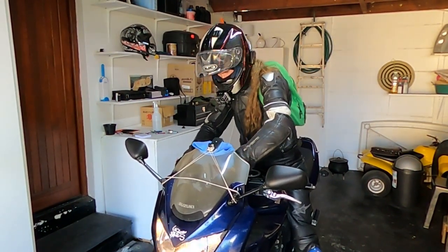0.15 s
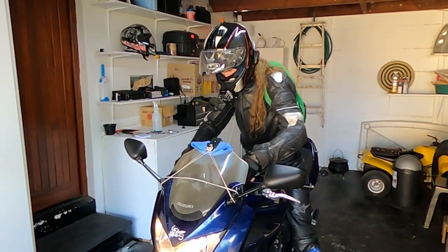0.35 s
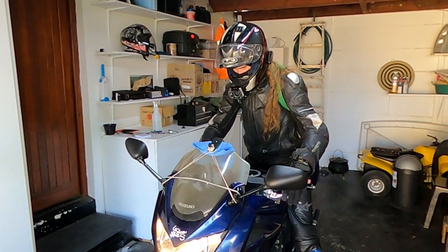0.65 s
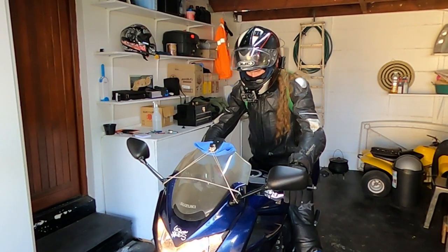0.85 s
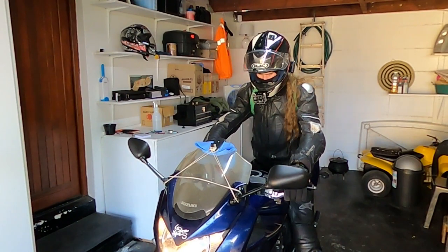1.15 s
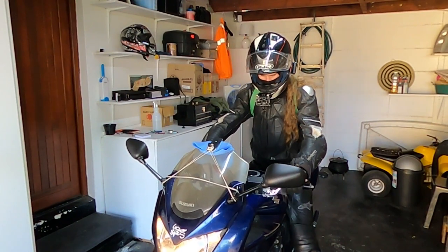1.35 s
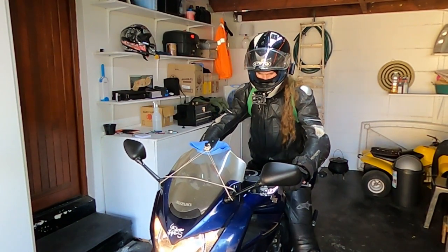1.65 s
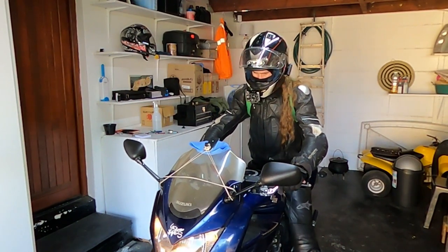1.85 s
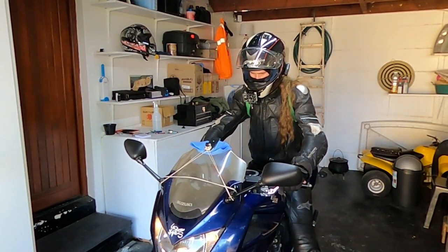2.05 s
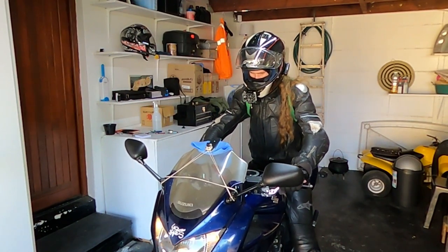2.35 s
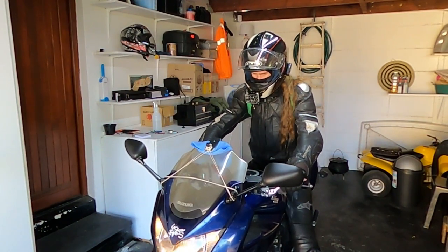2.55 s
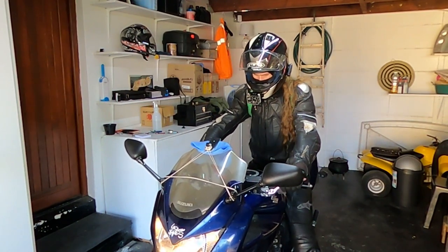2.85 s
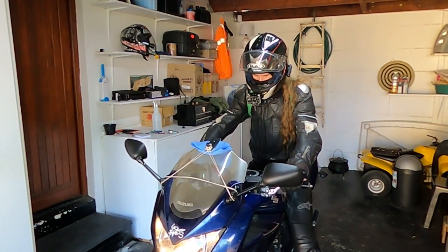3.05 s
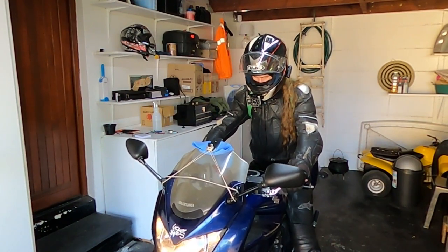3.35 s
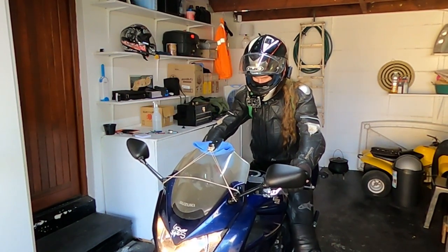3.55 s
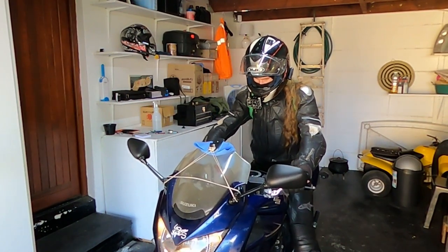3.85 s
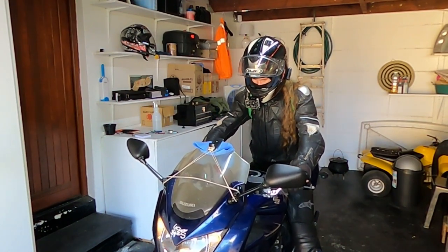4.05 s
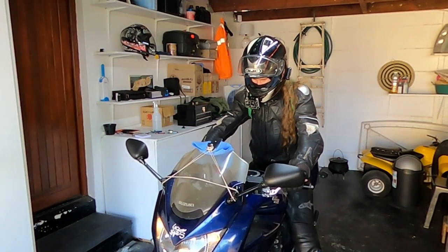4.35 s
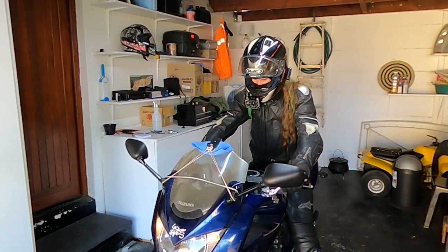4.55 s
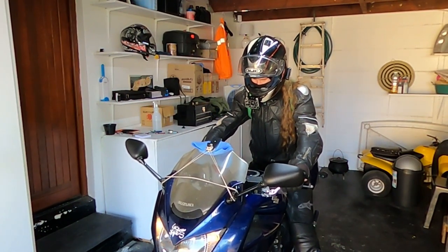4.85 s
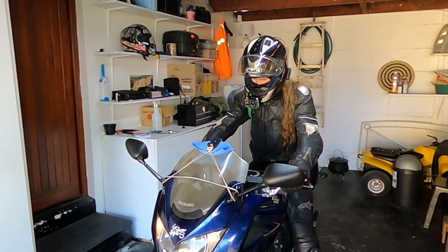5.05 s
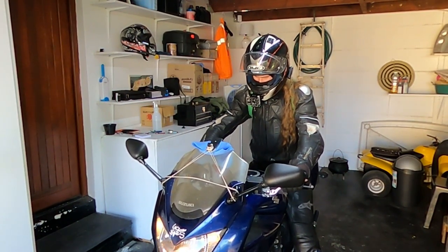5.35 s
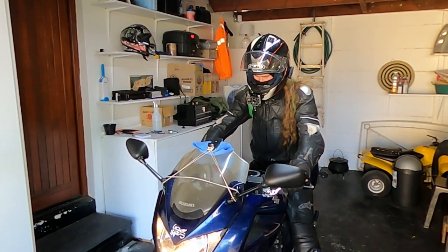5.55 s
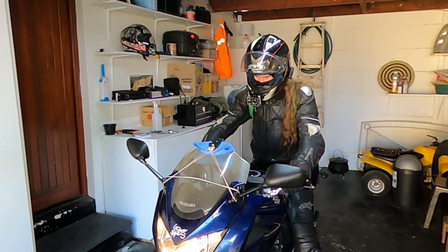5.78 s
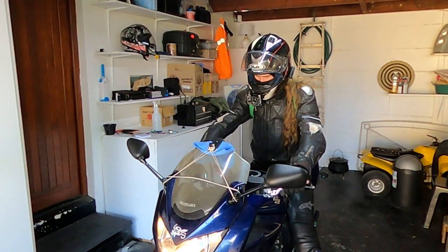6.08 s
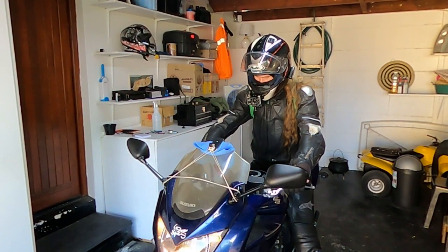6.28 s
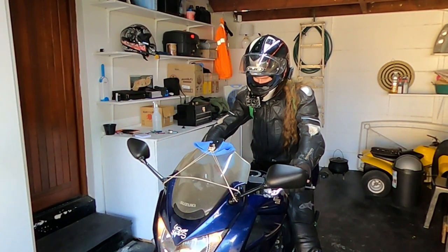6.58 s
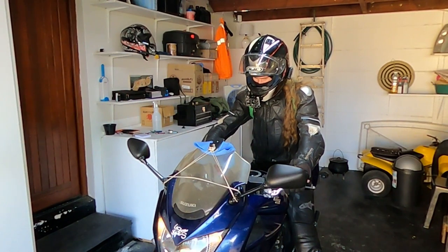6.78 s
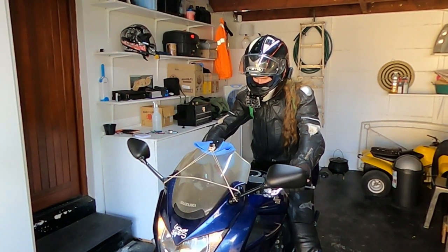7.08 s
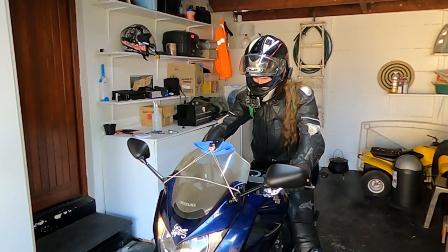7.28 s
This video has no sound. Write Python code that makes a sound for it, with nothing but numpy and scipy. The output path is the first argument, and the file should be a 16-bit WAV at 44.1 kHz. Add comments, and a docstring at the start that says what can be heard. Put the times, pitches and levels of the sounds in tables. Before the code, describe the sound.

In a small garage a motorcycle starter whines and sags through three cranking attempts, the exhaust booming briefly before the engine clacks to a stop

```python
"""A motorcycle is cranked three times in a small garage and will not stay running.
A switch clicks and the rider shifts in creaking leathers; then the starter gears whine, sagging at every compression.
Each time a few charges fire and boom in the exhaust; twice the engine coasts down and stops with a clack.
Whine: phase-driven tones. Exhaust, bike and switch: decaying modes. Grind, clatter, gas and leather: shaped noise."""
import sys
import numpy as np
from scipy import signal
from scipy.fft import rfft, irfft, next_fast_len
from scipy.io import wavfile
from scipy.ndimage import uniform_filter1d, map_coordinates

SR = 44100
rng = np.random.default_rng(int(sys.argv[2]) if len(sys.argv) > 2 else 0)


def store_pcm(level_fs):
    """Save levels as 16-bit WAV."""
    pcm = np.round(np.clip(level_fs, -1, 1) * 32767).astype(np.int16)
    wavfile.write(sys.argv[1], SR, np.atleast_2d(pcm).T)


N = 327222
TIME = np.arange(N) / SR

# presses of the starter button: (pressed [s], released [s], crank stops [s], top of first heave [Hz],
# rise to that top [s], strain [dB], extra brush hiss [dB])
ATTEMPTS = [(1.924, 2.39, 3.16, 1056, 0.13, 3, 6.5), (3.869, 5.3, 5.51, 842.4, .082, -0.5, -0.5),
            (6.365, 7.5, 8.2, 838, .094, 4.5, -3)]
# charges that fire: (time [s], relative level [dB], sharpness [dB per octave above 110 Hz])
FIRINGS = [(2.392, 2.5, -6.5), (2.405, 1.5, 2.5), (2.421, -1.5, 5.5), (2.445, -1, 3), (2.46, 0.5, 5.5),
           (3.042, -3.5, -2), (5.291, 1, -4.5), (5.304, -2.5, -2), (5.447, -2, -5.5), (6.968, 0.5, -7.5),
           (6.981, 0, -5.5), (7.15, -4, -5)]
# starter clutch snatches taking up the crank and as the crank rocks to rest:
# (time [s], level [dB], rattle t60 [s], jolt [dB])
CLACKS = [(1.936, -21.5, 0.28, -53.5), (3.196, -22.5, 0.084, -42), (3.884, -26.5, 0.49, -55.5),
          (5.559, -19.5, 0.21, -26.5), (5.709, -20.5, 0.073, -37), (6.392, -24.5, 0.19, -56)]


def starter(mesh_hz, load):
    """Gear teeth whine and grind, harder under load; the brushes hiss and the engine's innards churn."""
    # noise spectra: (frequency [Hz], relative level [dB])
    gear_spectrum = [(250, -21), (450, 1.5), (750, -13), (1200, 7), (2000, 2.5), (2900, -2), (3600, -8),
                     (5000, -11), (8000, -42.5), (14000, -29.5)]
    brush_spectrum = [(1500, -16.5), (3500, -0.5), (4700, -1), (6500, -4.5), (7600, -11), (8500, -10.5),
                      (10300, -13), (12000, -22.5), (14500, -38.5)]
    churn_spectrum = [(90, -19), (170, -3), (280, -6.5), (450, 0), (700, -0.5), (1100, -12), (2500, -42.5)]
    gear_gain, brush_gain, churn_gain = drive()

    phase = 2 * np.pi * np.cumsum(mesh_hz * (1 + .004 * wobble(180))) / SR
    rotor = np.cos(phase / 10)  # a ten-tooth pinion, slightly off centre

    grit = noise(gear_spectrum, grain_db=3.5, grain_rate=420)
    grit = grit * (1 + .5 * np.cos(phase)) * (1 + .033 * rotor)
    relative_speed = mesh_hz / 1100
    grind = gear_gain * crankcase(grit, coupling=.47) * relative_speed * (.4 + .34 * load)

    churn = churn_gain * crankcase(noise(churn_spectrum, grain_db=3, grain_rate=120), coupling=.52)
    churn = churn * (.67 + .57 * load)

    hiss = brush_gain * crankcase(noise(brush_spectrum, grain_db=2, grain_rate=600), coupling=.6)
    hiss = hiss * (1 + .2 * rotor) * (.45 + .85 * load)

    # the whine beams straight out of the casing; the grinding fills the room
    tones = garage(gear_gain * whine(phase, rotor, load), wet_db=-2.5)
    return tones + garage(grind + churn + hiss, wet_db=-1)


def whine(phase, rotor, load):
    """Loaded teeth sing and slack ones chatter; each tone flares as it glides through a casing resonance."""
    # gear tones: (multiple of mesh rate, relative level [dB])
    mesh_tones = [(1, 1), (2, -4), (3, -5), (4, -5), (5, -12), (6, -13), (7, -16), (8, -18)]
    slack = np.clip(1 - 1.6 * load, 0, 1)
    sway = phase + .12 * rotor + (.1 + .42 * slack) * wobble(300)
    teeth = sum(amp(db + 3 * wobble(90)) * np.sin(k * sway) for k, db in mesh_tones)
    # the casing radiates only the middle range well
    teeth = filtered(teeth * (1 + .25 * rotor),
                     lambda f: f ** 8 / (f ** 8 + 770. ** 8) / (1 + (f / 8300) ** 16))
    return crankcase(teeth, coupling=1) * (.33 + .53 * load)


def cranking(count=12):
    """Mesh rate [Hz] and load: a heave from rest, then each compression drags the motor down and frees it."""
    # mesh rate as teeth engage, after the first heave, running free, and the limit it sags towards
    engage_hz, labour_hz, free_base_hz, loaded_hz = 351, 751.7, 1259, 479.2
    sag_s, bite_s, relief_s = .09, .007, .016  # speed sags; load comes on; load lets go
    slack_load, heave_curve = .08, .78  # load that stays; power of time in the first heave's load
    lift_hz, lift_s = 170.8, .35  # a firing speeds the crank up for a while
    speed_scatter_hz, strain_scatter_db = 14, .43

    knots = []  # (time [s], mesh rate [Hz], load)
    u = np.linspace(0, 1, count)
    for s, _, _, top_hz, rise_s, db, _ in ATTEMPTS:
        span_hz = top_hz - engage_hz
        arc = u * (1 + np.sqrt(abs(top_hz - labour_hz) / span_hz))
        for a in arc:
            knots.append((s + rise_s * a, top_hz - span_hz * (1 - a) ** 2, amp(db) * min(a, 1) ** heave_curve))
        knots.append((s + rise_s * arc[-1] + relief_s, labour_hz, slack_load))

    for s, drag_s, db in compressions():
        lift = max([np.exp((fired - s) / lift_s) for fired, *_ in FIRINGS if fired < s], default=0)
        free_hz = free_base_hz + lift_hz * lift + rng.normal(0, speed_scatter_hz)
        strain = amp(db + rng.normal(0, strain_scatter_db))

        def sagged_hz(age_s):
            """Mesh rate a given time into the drag."""
            return loaded_hz + (free_hz - loaded_hz) * np.exp(-age_s / sag_s)

        knots.append((s - bite_s / 2, free_hz, 0))
        knots += [(s + bite_s / 2 + age_s, sagged_hz(age_s), strain) for age_s in drag_s * u]
        knots.append((s + drag_s + relief_s, sagged_hz(drag_s + relief_s), slack_load))

    s, hz, load = np.transpose(sorted(knots))
    return uniform_filter1d(np.interp(TIME, s, hz), size=400), np.interp(TIME, s, load)


def compressions():
    """(time [s], drag [s], strain [dB]) of every compression."""
    # runs of evenly spaced compressions: (first [s], last [s], drag of each [s], strain [dB])
    strokes = [(2.206, 2.308, .04, 4.5), (4.004, 4.004, .088, 3), (4.152, 5.199, .044, 2.5),
               (6.559, 6.56, .056, 4.5), (6.678, 6.872, 0.036, 3.5), (7.088, 7.208, .016, 1.5),
               (7.275, 7.369, 0.025, 3.5)]
    nominal_gap_s = .105
    return [(s, drag_s, db) for first, last, drag_s, db in strokes
            for s in np.linspace(first, last, round((last - first) / nominal_gap_s) + 1)]


def drive():
    """Gains of the gears, the brushes and the engine's churning while the button is held."""
    gear_db, brush_db, churn_db = -24, -33.5, -34  # before load and speed
    attack_s, release_s, churn_rise_s = .01, .033, .23
    extra_hiss_s = .053  # half-width of the extra hiss in the first heave
    gear, brush, churn = np.zeros((3, N))
    for s, released, _, _, rise_s, _, extra_db in ATTEMPTS:
        held = envelope(s, released, attack_s, release_s)
        gear += amp(gear_db) * held
        bump = np.exp(-((TIME - s - .55 * rise_s) / extra_hiss_s) ** 2)
        brush += amp(brush_db + extra_db * bump) * held
        churn += amp(churn_db) * envelope(s, released, churn_rise_s, release_s)
    return gear, brush, churn


def crankcase(x, coupling):
    """The casing rings at its own frequencies, more so the more firmly it is driven; rms 1."""
    # resonances and the dips between them: (centre [Hz], width [Hz], lift at coupling 1 [dB])
    case_modes = [(430, 40, 9), (860, 90, 4), (965, 50, 3), (1185, 80, 6), (1320, 50, 2), (1650, 170, 7),
                  (1950, 170, -4), (2408, 60, 7), (2890, 220, 12), (3450, 500, -6), (6300, 220, 8),
                  (7380, 250, 8), (10100, 500, 5)]
    return unit(filtered(x, lambda f: np.prod(
        [1 + (amp(coupling * db) - 1) * resonance(f, hz, width_hz) for hz, width_hz, db in case_modes], axis=0)))


def exhaust(pulses):
    """Every firing rings the pipe, a sharp one more in its upper modes."""
    # exhaust system modes: (frequency [Hz], relative level [dB], t60 [s])
    pipe_modes = [(29.7, -10, 0.93), (63.96, -10, 1), (80.3, -1, 0.26), (99.5, 2.5, 0.28),
                  (121.14, -19, 0.95), (154.3, -3, 0.33), (227.5, -13, 0.34), (282, -2, 0.027),
                  (347, -9, 0.088)]
    out, t = np.zeros(N), np.arange(SR * 3 // 4) / SR
    for s, db, sharp_db in pulses:
        ring = 0
        for hz, level_db, t60_s in pipe_modes:
            mode_db = level_db + sharp_db * np.log2(max(hz / 110, 1)) + rng.normal(0, 1)
            ring = ring + amp(mode_db - 60 * t / t60_s) * np.cos(2 * np.pi * hz * t)
        add(out, s, amp(db - 13) * ring * (1 - np.exp(-t / .0021)))
    return out


def exhaust_pulses(count=2):
    """Firings, the softer puffs that follow each, and the beat of the engine running on."""
    # the first catch runs on, quickening a little, then slowing at the end:
    # (time [s], puff rate [1/s], relative level [dB], sharpness [dB/octave])
    run_on = [(2.518, 31, -3.5, -0.5), (2.751, 32, -4, -3.5), (2.861, 35, -2, -12), (2.99, 28, -7.5, -9)]
    gap_s, loss_db, puff_sharp_db = .04, 11, -6  # puff spacing, loss per puff, sharpness
    scatter_s, scatter_db = .00207, 1.5

    puffs = [(s + k * gap_s, db - k * loss_db, puff_sharp_db)
             for s, db, _ in FIRINGS for k in range(1, count + 1)]
    when, rate, level_db, sharp_db = np.transpose(run_on)
    beats = np.cumsum(np.interp(TIME, when, rate, left=0, right=0)) / SR
    beat_times = TIME[np.flatnonzero(np.diff(np.ceil(beats)))]
    puffs += [(s, np.interp(s, when, level_db), np.interp(s, when, sharp_db)) for s in beat_times]
    return list(FIRINGS) + [(s + rng.normal(0, scatter_s), db + rng.normal(0, scatter_db), sharp)
                            for s, db, sharp in puffs]


def gas(pulses):
    """Burnt gas rasps out of the silencer after each firing, most after the sharp ones."""
    burst, t = np.zeros(N), np.arange(SR // 4) / SR
    for s, db, sharp_db in pulses:
        add(burst, s, amp(db + 1.2 * sharp_db - 23.5 - 60 * t / .15))
    return burst * noise([(60, -11.5), (150, 14.5), (330, 6.5), (550, -38.5), (1200, -21), (4000, -45)])


def engine():
    """Valve gear and chain clatter after firings and in the coast; the clutch clacks on grabbing or stopping."""
    # noise spectra: (frequency [Hz], relative level [dB])
    clatter_spectrum = [(240, -31), (400, -7), (438, -2), (839, -13.5), (1210, -8), (1320, -8.5),
                        (1580, -10), (3750, -18.5), (7760, -31), (12400, -53), (14900, -63.5)]
    clutch_spectrum = [(260, -13.5), (450, 0), (1270, -0.5), (2320, -6.5), (2890, 2), (3390, -10),
                       (4700, -5.5), (5580, -17.5), (7260, -11.5), (8160, -28), (9590, -27.5),
                       (14900, -59.5)]
    coast_db, fade_db_per_s, kick_db, kick_t60_s = -30, 7.5, -26.5, .6

    coasting = sum(envelope(released, stop, .01, .015) * amp(-fade_db_per_s * (TIME - released))
                   for _, released, stop, *_ in ATTEMPTS)
    level = np.hypot(amp(coast_db) * coasting, amp(kick_db) * surges(FIRINGS, kick_t60_s))
    clatter = level * crankcase(noise(clatter_spectrum, grain_db=2.5, grain_rate=400), coupling=.11)

    snatch, t = np.zeros(N), np.arange(SR // 3) / SR
    for s, db, t60_s, _ in CLACKS:
        add(snatch, s, amp(db - 60 * t / t60_s))
    return clatter + snatch * noise(clutch_spectrum, grain_db=-.5, grain_rate=230)


def shudder():
    """Each compression rocks the whole bike with a dull thud."""
    # frame rocking on its springs and tyres: (frequency [Hz], relative level [dB], t60 [s])
    frame_modes = [(31, -41.5, 0.83), (74.4, -24.5, 0.14)]
    thud_share = .695  # how far into a compression the bike rocks
    out, t = np.zeros(N), np.arange(SR // 2) / SR
    for s, drag_s, db in compressions():
        thud = sum(amp(level_db + db + rng.normal(0, 1) - 60 * t / t60_s) * np.sin(2 * np.pi * hz * t)
                   for hz, level_db, t60_s in frame_modes)
        add(out, s + thud_share * drag_s, 2 * thud * (1 - np.exp(-t / .039)))
    return out


def rumble():
    """The bike trembles while the crank turns and is jolted by firings and clacks."""
    turning_db, rise_s, fall_s = -36, .26, .08
    firing_jolt_db, jolt_t60_s = -52, .66
    turning = sum(envelope(s, stop, rise_s, fall_s) for s, _, stop, *_ in ATTEMPTS)
    jolts = [(s, db + firing_jolt_db) for s, db, _ in FIRINGS] + [(s, db) for s, _, _, db in CLACKS]
    level = np.hypot(amp(turning_db) * turning, surges(jolts, jolt_t60_s))
    return level * noise([(18, -6), (30, 0), (45, -8), (62, -6), (95, -16), (150, -24), (400, -70)],
                         grain_db=2, grain_rate=12)


def rider():
    """Leathers rub on the seat and crinkle; small handlebar controls click."""
    # shifts of weight: (time [s], length [s], seat rub [dB], leather [dB])
    shifts = [(0.423, 0.29, -58.5, -57.5), (0.64, 0.19, -54.5, -51.5), (0.854, 0.25, -44.5, -49.5),
              (1.133, 0.21, -46.5, -47.5), (1.32, 0.19, -45.5, -52.5)]
    # noise spectra: (frequency [Hz], relative level [dB])
    seat_spectrum = [(65, -45), (110, -11), (270, -2), (374, -4.5), (453, -8.5), (650, -15), (900, -23.5),
                     (1170, -32), (1980, -120)]
    leather_spectrum = [(350, -23.5), (600, -9.5), (891, -10.5), (1360, -7), (1820, -12.5), (5570, -27.5),
                        (6610, -25), (12400, -52), (14000, -68)]
    # small controls: (time [s], relative level [dB], pitch [Hz])
    control_clicks = [(0.058, -37.5, 1790), (0.093, -31, 5800), (0.098, -35, 1960), (0.452, -46, 1540),
                      (0.681, -37.5, 2500), (1.46, -44, 6600), (3.815, -40, 1380), (6.05, -54.5, 1490)]
    attack_s, release_s = .026, .053

    rub, crinkle = sum(amp([[seat_db], [leather_db]]) * envelope(s, s + length_s, attack_s, release_s)
                       for s, length_s, seat_db, leather_db in shifts)
    out = rub * noise(seat_spectrum, grain_db=3, grain_rate=82)
    out += crinkle * noise(leather_spectrum, grain_db=4, grain_rate=300)

    t = np.arange(SR // 8) / SR
    for s, db, hz in control_clicks:
        tick = np.zeros(N)
        decay = amp(db + 10 - 60 * t / .086) * (1 - np.exp(-t / .0066))
        add(tick, s, decay * rng.standard_normal(len(t)))
        out += filtered(tick, lambda f: resonance(f, hz, hz * 1.15) ** 2 / (1 + (f / 11500) ** 8))
    return out


def switch():
    """The switch's metal rings on, short and bright, after its click."""
    # ring modes: (frequency [Hz], relative level [dB], t60 [s])
    ring_modes = [(4732, -0.5, 0.1), (7660, -12, 0.37), (7843, -4.5, 0.23), (7989, -12.5, 0.3),
                  (11070, -21.5, 0.47)]
    start_s, level_db = .096, -44  # level: rms of the first 20 ms
    out, t = np.zeros(N), np.arange(SR // 2) / SR
    ring = sum(amp(db - 60 * t / t60_s) * np.sin(2 * np.pi * hz * t) for hz, db, t60_s in ring_modes)
    add(out, start_s, amp(level_db) * ring / np.sqrt(np.mean(ring[:SR // 50] ** 2)))
    return out


def background_hiss():
    """Faint, slowly fluctuating broadband noise."""
    # noise spectrum: (frequency [Hz], relative level [dB])
    hiss_spectrum = [(12, -46), (20, 4.5), (108, -3.5), (216, -0.5), (336, -9), (568, -14.5), (962, -18),
                     (1040, -17), (1460, -11.5), (2030, -19), (2830, -23.5), (4050, -27.5), (4400, -30),
                     (5970, -25), (14900, -51.5)]
    return amp(-59.5) * noise(hiss_spectrum, grain_db=1, grain_rate=14)


def garage(x, wet_db):
    """Close walls: a short decaying-noise tail, spread to stereo by mid and side."""
    # decay: (frequency [Hz], t60 [s])
    decay_points = [(150, 0.94), (600, 0.4), (2000, 0.41), (6000, 0.49), (12000, 0.24)]
    # stereo width: (frequency [Hz], relative side level [dB])
    width_points = [(100, -10), (600, -42), (1300, -5), (3000, -3), (6000, -3), (8500, -3.5), (13000, 0.5)]
    hz, t, z = signal.stft(rng.standard_normal((2, SR * 2 // 3)), SR, nperseg=256)
    t60_s = along(decay_points, hz)[:, None]
    tails = signal.istft(z * amp(-60 * t / t60_s) * np.minimum(t / .002, 1), SR, nperseg=256)[1]
    mid, side = signal.fftconvolve(x[None], tails / np.linalg.norm(tails[0]), axes=1)[:, :N]
    mid = (x + amp(wet_db) * mid) / np.hypot(1, amp(wet_db))
    side = filtered(side, lambda f: amp(along(width_points, f) - 7.5))
    return np.array([mid + side, mid - side])


def amp(db):
    """Decibels to gain."""
    return 10 ** (np.asarray(db) / 20)


def unit(x):
    """Scale to rms 1."""
    return x / np.sqrt(np.mean(x ** 2) + 1e-20)


def along(points, hz):
    """(frequency [Hz], value) points read on a log frequency axis."""
    f, v = np.transpose(points)
    return np.interp(np.log(hz + 1), np.log(f + 1), v)


def wobble(rate):
    """A smooth random curve, rate knots a second."""
    return map_coordinates(rng.standard_normal(int(N * rate / SR) + 4), [TIME * rate])


def filtered(x, response):
    """x times a response of frequency [Hz]."""
    m = next_fast_len(N + SR // 2)
    return irfft(rfft(x, m) * response(np.fft.rfftfreq(m, 1 / SR)), m)[..., :N]


def noise(spectrum, grain_db=0, grain_rate=500):
    """Coloured noise of rms 1, clumped into grains."""
    grains = rng.standard_normal(N) * amp(grain_db * wobble(grain_rate))
    return unit(filtered(grains, lambda f: amp(along(spectrum, f))))


def add(track, s, sound):
    """Mix a sound in at time s."""
    part = track[round(s * SR):][:len(sound)]
    part += sound[:len(part)]


def resonance(f, hz, width_hz):
    """Response of one damped mode."""
    return 1j * f * width_hz / (hz * hz - f * f + 1j * f * width_hz)


def envelope(start, end, attack_s, release_s):
    """Rise from start, hold until end, die away."""
    rise = 1 - np.exp(-np.maximum(TIME - start, 0) / attack_s)
    return rise * np.exp(-np.maximum(TIME - end, 0) / release_s)


def surges(events, t60_s):
    """A gain that jumps at each (time [s], level [dB]) and dies away; overlapping ones add in power."""
    power, t = np.zeros(N), np.arange(SR) / SR
    for s, db, *_ in events:
        add(power, s, amp(db - 60 * t / t60_s) ** 2)
    return np.sqrt(power)


def scene():
    """The bike and its rider in the garage, over a faint background hiss."""
    pulses = exhaust_pulses()
    rest = garage(engine() + gas(pulses) + rider() + switch(), wet_db=-1)
    hiss = garage(background_hiss(), wet_db=-3)
    balance = amp([[-.2], [.2]])  # left, right
    return (starter(*cranking()) + rest + hiss) * balance + exhaust(pulses) + shudder() + rumble()


def record(dry):
    """Round off the highest peaks, then drop the deepest bass and everything above the band limit."""
    top_hz, bass_hz = 14500, 18
    rounded = dry / (1 + np.abs(dry / .75) ** 6) ** (1 / 6)
    return filtered(rounded, lambda f: (f < top_hz) * 1j * f / (1j * f + bass_hz))


dry = scene()
out = record(dry)
store_pcm(out)
```